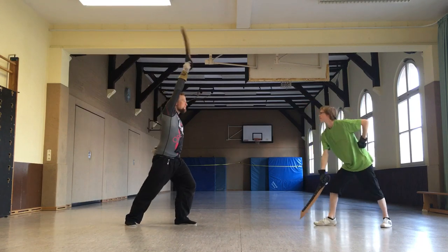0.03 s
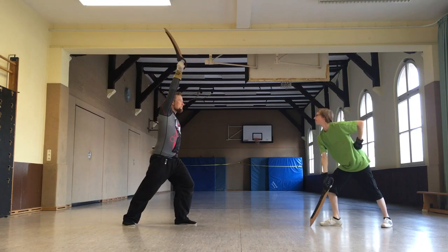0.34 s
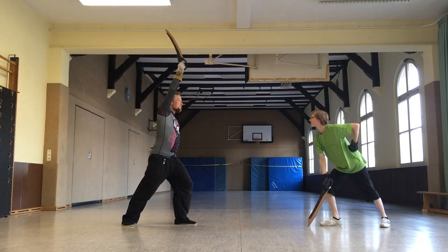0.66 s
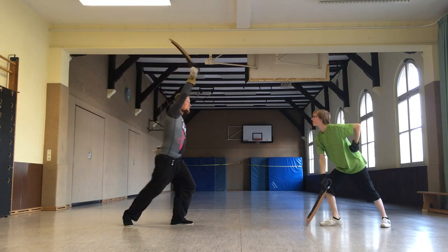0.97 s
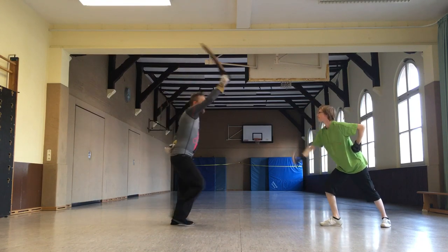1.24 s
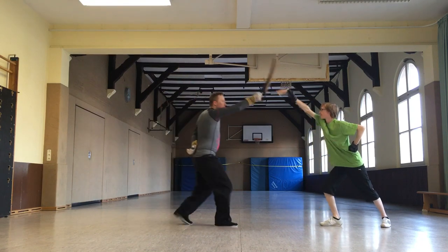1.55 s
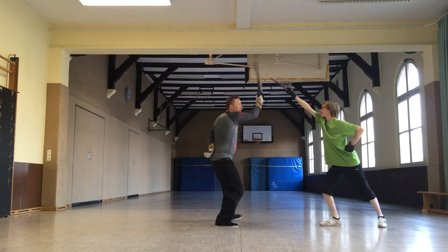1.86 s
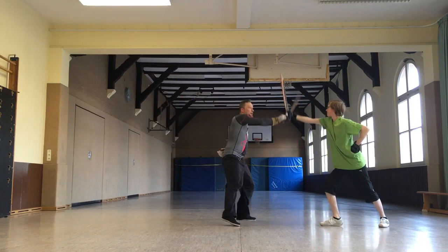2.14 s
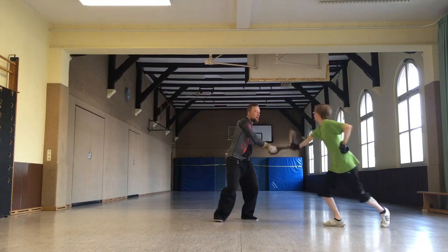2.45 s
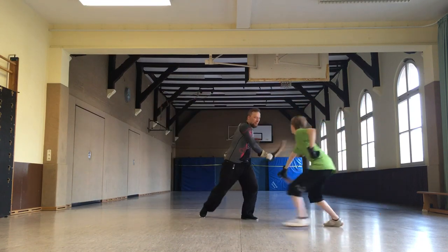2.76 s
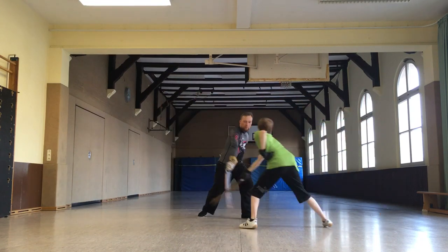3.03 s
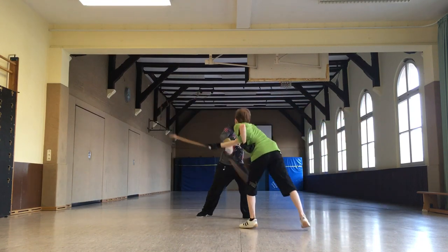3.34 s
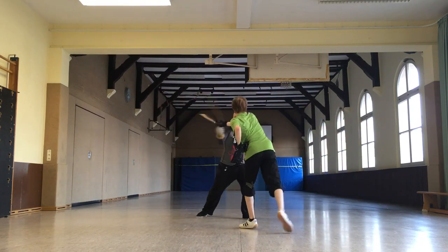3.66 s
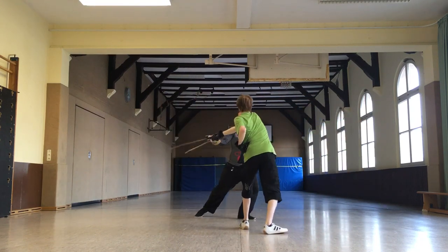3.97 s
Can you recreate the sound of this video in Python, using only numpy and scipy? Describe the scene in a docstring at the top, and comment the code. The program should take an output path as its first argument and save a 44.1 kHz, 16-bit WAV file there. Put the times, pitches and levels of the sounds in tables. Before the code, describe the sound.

Wooden practice swords knock together a few metres from the microphone in a big, echoing gym. Soft steps and light taps lead to heavier footfalls, a dull body blow, then one sharp crack and two more knocks.

```python
"""A big gym hall, the microphone a few metres from two people drilling with wooden training swords.
The blades tap, slide and at last crack together hard, chattering and ringing briefly. Dull blows land
on arm and body, the sprung floor booms under the feet, clothes rustle, soles drag, twist and slap.
Floor, ceiling and far wall throw each sound back into a long reverberation over a quiet rumble."""
import sys
import numpy as np
from scipy import signal
from scipy.fft import rfft, irfft
from scipy.io import wavfile

SR = 44100
rng = np.random.default_rng(int(sys.argv[2]) if len(sys.argv) > 2 else 0)


def dump_mix(stems):
    """Bounce the given channels to the path in sys.argv[1] as a 16-bit WAV at rate SR."""
    frames = np.atleast_2d(stems).T  # one column per channel
    limited = np.clip(frames, -1, 1)  # hard clip at full scale
    pcm = np.round(limited * 32767).astype(np.int16)
    wavfile.write(sys.argv[1], SR, pcm)


N = 176400
T = np.arange(N) / SR

# Levels are relative within a table; a colour is a spectrum with the columns freq_hz, gain_db.
# the blades chattering in the hard strike: start_s, level_db
CHATTER = [(3.7701, -10), (3.7709, -14), (3.7716, -13)]
# colour of that crack towards the microphone, and averaged over all directions
CRACK_MIC_COLOUR = [(80, 0), (200, 23), (400, -7), (800, -13), (1450, 16), (1850, 1), (2400, -29),
                    (3500, -7), (4500, 10.5), (6400, 4.5), (8500, 0), (12000, 3.5), (16000, 4)]
CRACK_HALL_COLOUR = [(60, 4), (110, 11), (190, 6.5), (290, 11), (420, 0), (680, 4.5), (950, 4.5),
                     (1450, 11.5), (2300, 6.5), (3400, 2), (4700, 6), (7300, 1.5), (9000, 5.5),
                     (12000, 2.5), (16000, -5)]
# ringing of the blades: pitch_hz, level_db, t60_s
BLADE_MODES = [(1305, -1, 0.12), (1360, -10, 0.37), (1550, 1, 0.26), (1563, 6, 0.19), (2780, 1, 0.069),
               (3450, 0, 0.073), (3830, -3.5, 0.08), (4770, 4.5, 0.056), (5020, -5, 0.14),
               (5740, -19, 0.21), (5930, 5, 0.053), (6670, 6, 0.085), (9200, -5, 0.16), (11800, 9, 0.098)]
# light contacts of blades, and last the slap of a landing foot:
# start_s, level_db, treble_corner_hz, direct_db (bodies may screen the microphone)
TAPS = [(1.716, -39.5, 2780, 0.5), (2.4068, -34.5, 2385, 6), (2.416, -32, 2840, 0),
        (2.424, -46, 5960, 20.5), (2.994, -27, 1030, -1), (3.055, -22, 3160, 1.5), (3.06, -46, 4000, 11),
        (3.9251, -23, 4030, 3), (3.969, -22.5, 1900, 3.5)]
TAP_COLOUR = [(100, 20), (250, 16.5), (500, 0.5), (1300, 13.5), (2500, 11), (5000, 6), (9000, 7.5),
              (16000, 12)]
# blade sliding along blade: start_s, level_db, rise_s, fade_s
SLIDES = [(2.422, -47.5, 0.014, 0.022)]
SLIDE_COLOUR = [(300, -24), (1200, 6), (2100, 12), (3500, -6.5), (5500, 8), (7200, 2), (9000, 10),
                (12000, 3), (15500, -13)]
# dull blows on arm and body: start_s, level_db, slap_db
KNOCKS = [(1.43, -43, -77), (1.718, -49.5, -73), (3.0452, -24, -39)]
# their resonances: pitch_hz, level_db, t60_s
KNOCK_MODES = [(231.3, -5, 0.13), (304, -13.5, 0.1), (595, 1, 0.034), (757, 3, 0.028), (954, -11, 0.044)]
# colour of a knock averaged over all directions
KNOCK_HALL_COLOUR = [(70, -2), (150, 13), (240, 28), (330, 25.5), (450, 15.5), (620, 23), (870, 20.5),
                     (1100, 21), (2500, -19), (16000, -29)]
# footfalls on the sprung floor: start_s, level_db, pitch_hz, time_to_full_load_s
STEPS = [(.471, -39.5, 100.2, 0.012), (0.521, -41.5, 79, .02), (0.587, -48.5, 90.5, 0.013),
         (1.568, -48, 108, 0.016), (1.654, -47.5, 69.3, 0.032), (2.092, -41.5, 119.5, 0.017),
         (2.131, -30, 62.2, 0.024), (2.193, -33, 65.3, 0.01), (2.249, -42, 64.9, 0.038),
         (2.909, -43, 148.8, 0.015), (2.954, -39, 130, 0.0087), (2.996, -28, 190, 0.0027),
         (3.011, -22, 122.2, 0.0062), (3.028, -29, 162.6, 0.0079), (3.055, -33.5, 75, 0.018),
         (3.965, -31.5, 99.5, .008)]
# clothes and shuffling soles: start_s, level_db, rise_s, fade_s
RUSTLES = [(.12, -66, 0.062, 0.065), (.98, -67, 0.074, 0.043), (1.14, -71, 0.047, .05),
           (1.40, -68.5, 0.022, 0.11), (1.85, -74, 0.063, 0.6), (2.21, -68.5, 0.065, 0.4),
           (2.72, -70.5, 0.072, .09), (2.89, -65.5, 0.039, 0.043), (3.06, -62, 0.098, 0.093)]
RUSTLE_COLOUR = [(200, -4), (700, 4.5), (1500, 7), (3000, 5), (5000, -0.5), (7300, -1), (9000, 2.5),
                 (12500, 2.5), (16000, -2)]
# a low thud dying away in the hall at the start, then soles dragging: start_s, level_db, rise_s, fade_s
THUD_AND_DRAGS = [(0, -64, 0.008, 0.1), (1.47, -66.5, 0.06, 0.24), (2.0, -72.5, 0.058, 0.18),
                  (2.51, -84, .04, 0.089)]
THUD_AND_DRAG_COLOUR = [(150, 7), (290, 8), (500, -5), (900, -2), (1300, 0), (2800, -12.5), (5000, -17),
                        (15000, -23)]
# a sole twisting: start_s, level_db, rise_s, fade_s
SCUFFS = [(.08, -68, 0.1, 0.16)]
SCUFF_COLOUR = [(200, -14), (1500, -14), (2600, 1.5), (3800, -2), (4900, 4), (6000, -5), (15000, -6)]
# first reflections at the microphone: delay_s, level_db
REFLECTIONS = [(.0062, -9.5), (.0078, -7), (.0101, -0.5), (0.013, -1), (.0225, -18.5), (0.0516, -8.5),
               (.002, -10.5), (.0042, -18)]
# reverberant tail of the hall: freq_hz, t60_s
TAIL_T60 = [(60, 1.08), (160, 1.01), (500, 2.2), (1400, 1.92), (3000, 1.75), (5000, 1.4), (9000, 0.8),
            (16000, 0.44)]
TAIL_COLOUR = [(50, -2.5), (150, 8), (500, 4), (1500, -4), (4000, 1.5), (8000, -4), (16000, 0)]
# colour of the hall's steady rumble
ROOM_TONE_COLOUR = [(20, -48), (35, -1), (55, -1.5), (100, 0), (200, -5.5), (300, -6.5), (450, -19),
                    (900, -25), (2000, -24.5), (4000, -29), (7500, -37.5), (8500, -34), (12500, -35.5),
                    (16000, -43.5)]


def strike(hall_db=-10, ring_db=-54):
    """The blades meet hard, chatter and ring briefly; the hall takes the chatter as one blow."""
    out, start = np.zeros((2, N)), CHATTER[0][0]
    for at, db in CHATTER:
        add(out[0], at, undb(db) * contact(CRACK_MIC_COLOUR, fade_s=0.00022, direct_db=0)[0])
    add(out[1], start, undb(hall_db) * click(CRACK_HALL_COLOUR))
    add(out, start, undb(ring_db) * ring(BLADE_MODES))
    return out


def taps():
    """Light contacts of blades and the slap of a landing foot, each with its own treble roll-off."""
    out = np.zeros((2, N))
    for at, db, corner_hz, direct_db in TAPS:
        tap = contact(TAP_COLOUR, fade_s=0.0019, direct_db=direct_db)
        add(out, at, undb(db) * lowpass(tap, corner_hz, order=1))
    return out


def contact(colour, fade_s, direct_db):
    """A brief hit: row 0 is the gritty crunch at the microphone, row 1 the even pulse into the hall."""
    t = T[:1024]
    crunch = undb(direct_db) * unit(rng.standard_normal(len(t)) * np.exp(-t / fade_s))
    pulse = click(colour)
    return np.array([signal.fftconvolve(crunch, pulse)[:len(pulse)], pulse])


def knocks(top_hz=1020):
    """Hollow blows with a small slap; a padded contact is slow to push, so the thud is dull."""
    out = np.zeros((2, N))
    thud = lowpass(ring(KNOCK_MODES), top_hz, order=4) / 2
    for at, db, slap_db in KNOCKS:
        add(out[0], at, undb(db) * thud)
        add(out[1], at, undb(db) * click(KNOCK_HALL_COLOUR))
        add(out, at, undb(slap_db) * contact(TAP_COLOUR, fade_s=0.0038, direct_db=5.5))
    return out


def footfalls(overtone_ratio=2.1, overtone_db=-15):
    """Weight comes onto the sprung floor, which booms for a few cycles."""
    out, t = np.zeros(N), T[:SR // 2]
    for at, db, hz, load_s in STEPS:
        swell = (t / load_s * np.exp(1 - t / load_s)) ** 2
        phase = 2 * np.pi * hz * t
        boom = np.sin(phase) + undb(overtone_db) * np.sin(overtone_ratio * phase)
        add(out, at, undb(db) * swell * boom)
    return out


def rubbing(events, colour, grain_db, grain_s):
    """Grainy noise that swells and fades: friction of wood, cloth or sole, or a thud dying away."""
    effort = np.zeros(N)
    for at, db, rise_s, fade_s in events:
        swell = np.clip((T - at) / rise_s, 0, 1)
        effort += undb(db) * swell * np.exp(-np.maximum(T - at - rise_s, 0) / fade_s)
    grain = undb(grain_db * np.interp(T / grain_s, np.arange(N), rng.standard_normal(N)))
    return effort * grain * noise(colour)


def hall(tail_db=7.5, build_s=0.0048, near_db=1.5, far_wall_db=-13):
    """Response of the gym: a long tail, near scatter, the far wall and smeared first reflections."""
    t = T[:2 * SR]
    hz = np.fft.rfftfreq(len(t), 1 / SR)
    first_s = REFLECTIONS[0][0]
    age = np.maximum(t - first_s, 0)

    def scatter(delay_s, fade_s):
        """A reflection spread into a dying burst of noise."""
        burst = rng.standard_normal(len(t)) * (t > delay_s)
        return unit(burst * np.exp(-np.maximum(t - delay_s, 0) / fade_s))

    white = rfft(rng.standard_normal(len(t)))
    centres_hz = np.geomspace(40, 16000, 14)
    tail = 0
    for centre, share in zip(centres_hz, np.eye(len(centres_hz))):
        band = irfft(white * along(list(zip(centres_hz, share)), hz))
        decay = np.exp(-np.log(1000) * age / along(TAIL_T60, centre))
        tail += band * undb(along(TAIL_COLOUR, centre)) * decay
    tail = undb(tail_db) * unit(tail * (1 - np.exp(-age / build_s)))
    near = undb(near_db) * scatter(first_s, fade_s=0.054)
    far_wall = undb(far_wall_db) * lowpass(scatter(delay_s=0.18, fade_s=0.031), hz=3980)
    early = sum(undb(db) * scatter(delay_s, fade_s=0.0021) for delay_s, db in REFLECTIONS)
    return tail + near + far_wall + early


def at_mic(direct, radiated):
    """Direct sound plus the hall's answer, which differs for each place in the room."""
    return direct + signal.fftconvolve(radiated, hall())[:N]


def room_tone(level_db=-61):
    """The quiet, steady rumble of the hall."""
    return undb(level_db) * noise(ROOM_TONE_COLOUR)


def undb(db):
    """Decibels to gain."""
    return 10 ** (np.asarray(db) / 20)


def unit(x):
    """Scale to an energy of 1."""
    return x / np.sqrt(np.sum(x ** 2))


def along(points, hz):
    """Read a table on a log-frequency axis."""
    freqs, values = np.array(points, float).T
    return np.interp(np.log(np.maximum(hz, 1)), np.log(freqs), values)


def noise(colour):
    """Noise of the given colour, rms 1."""
    gain = undb(along(colour, np.fft.rfftfreq(N, 1 / SR)))
    return unit(irfft(rfft(rng.standard_normal(N)) * gain, N)) * np.sqrt(N)


def click(colour, size=2048):
    """The shortest causal pulse of the given colour."""
    gain = undb(along(colour, np.fft.rfftfreq(size, 1 / SR)))
    cepstrum = irfft(np.log(gain))
    cepstrum[1:size // 2] *= 2
    cepstrum[size // 2 + 1:] = 0
    return irfft(np.exp(rfft(cepstrum)))


def lowpass(x, hz, order=2):
    """Dull the treble above a corner."""
    return signal.sosfilt(signal.butter(order, hz, fs=SR, output="sos"), x)


def ring(modes):
    """Decaying modes after one blow."""
    t = T[:SR // 2]
    return sum(undb(db) * np.sin(2 * np.pi * hz * t) * np.exp(-np.log(1000) * t / t60)
               for hz, db, t60 in modes)


def add(out, at, sound):
    """Mix a sound in at a time in seconds."""
    i = int(at * SR)
    out[..., i:i + sound.shape[-1]] += sound[..., :max(N - i, 0)]


def scene(step_wet_db=-16, knock_wet_db=-4, rub_db=-8):
    """The drill from a few metres away, in mono, over the room tone."""
    steps = footfalls()
    knock_direct, knock_radiated = knocks()
    slide = rubbing(SLIDES, SLIDE_COLOUR, grain_db=2.5, grain_s=0.0015)
    clothes = rubbing(RUSTLES, RUSTLE_COLOUR, grain_db=0.5, grain_s=0.0094)
    thud_and_drags = rubbing(THUD_AND_DRAGS, THUD_AND_DRAG_COLOUR, grain_db=6.5, grain_s=0.008)
    scuff = rubbing(SCUFFS, SCUFF_COLOUR, grain_db=4.5, grain_s=0.0036)
    rubs = undb(rub_db) * (slide + clothes + thud_and_drags + scuff)
    feet = at_mic(steps, undb(step_wet_db) * steps)
    blows = at_mic(knock_direct, undb(knock_wet_db) * knock_radiated)
    hits = at_mic(*taps()) + at_mic(*strike())
    return (hits + blows + feet + at_mic(rubs, rubs) + room_tone())[None]


def record(dry, low_cut_hz=42, top_hz=15850):
    """The microphone drops the deepest bass and the highest treble."""
    thin = signal.sosfilt(signal.butter(4, low_cut_hz, "high", fs=SR, output="sos"), dry)
    return signal.sosfilt(signal.ellip(10, .1, 80, top_hz, fs=SR, output="sos"), thin)


dry = scene()
out = record(dry)
dump_mix(out)
```